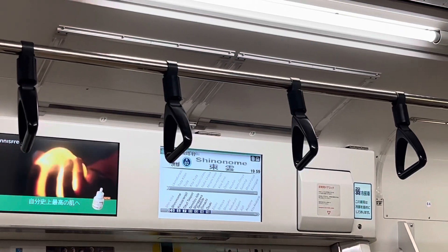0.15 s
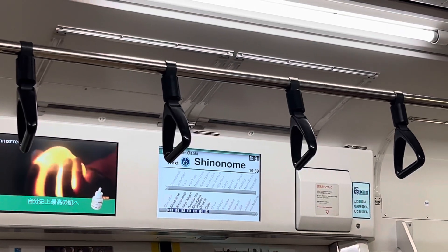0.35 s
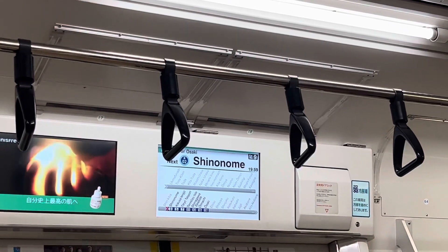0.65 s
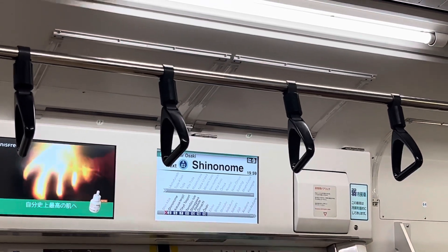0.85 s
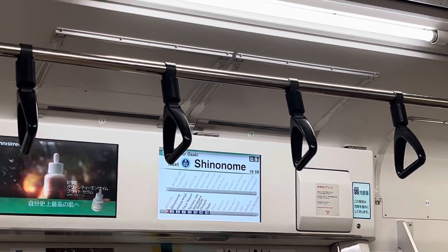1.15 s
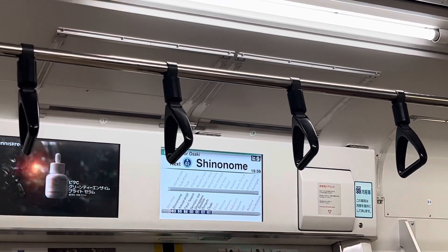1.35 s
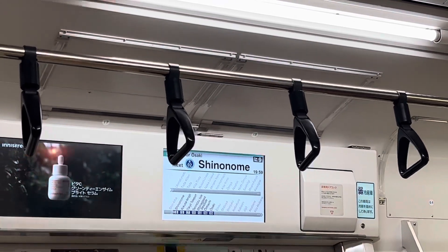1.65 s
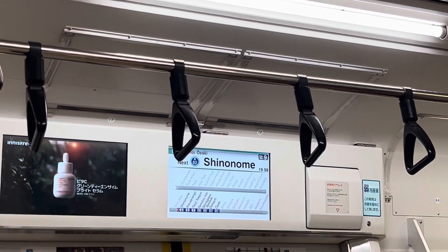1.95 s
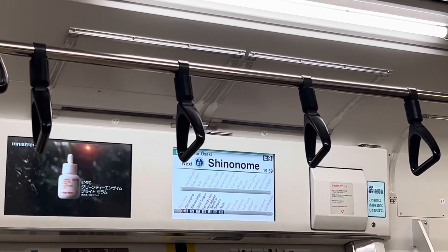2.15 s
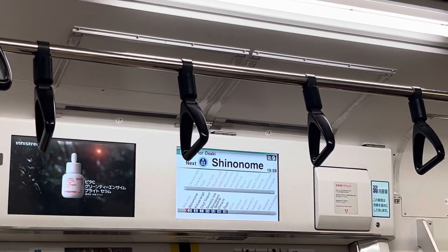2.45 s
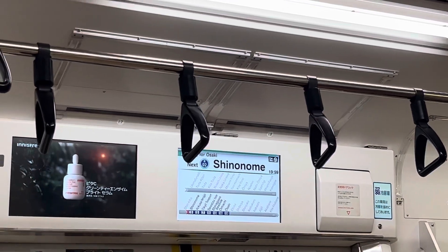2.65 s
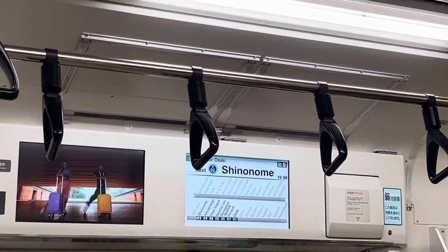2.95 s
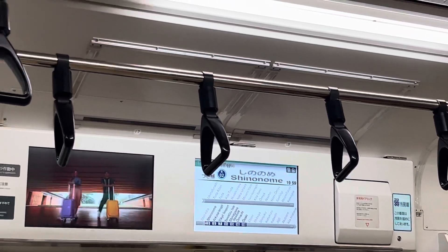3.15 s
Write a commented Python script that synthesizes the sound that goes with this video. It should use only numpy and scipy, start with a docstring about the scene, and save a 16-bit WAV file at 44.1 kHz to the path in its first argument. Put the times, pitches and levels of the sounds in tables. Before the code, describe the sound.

A commuter train rumbles along the rails at steady speed, heard inside with humming motors.

```python
"""Inside a commuter train

The train runs at a nearly steady speed. Low-pitched noise and short deep tones make the car body boom and jolt.
Noise swells make the wheels roar on the rails; narrow noise bands let them ring, and short tones squeal.
The motors hum in sine tones at multiples of a slightly rising shaft speed; the strongest one fades late on.
A soft gear drone comes up midway, and the hiss of ventilation and rolling lies behind it all."""
import sys
import numpy as np
from scipy import signal
from scipy.fft import rfft, irfft, next_fast_len
from scipy.io import wavfile
from scipy.ndimage import uniform_filter1d, map_coordinates

SR = 44100
rng = np.random.default_rng(int(sys.argv[2]) if len(sys.argv) > 2 else 0)


def waveform_to_disk(signal):
    """Save audio, clipped to [-1, 1], as 16-bit WAV at the path in sys.argv[1]."""
    frames = np.transpose(np.atleast_2d(signal))
    scaled = np.clip(frames, -1, 1) * 32767
    samples = np.round(scaled).astype(np.int16)
    wavfile.write(sys.argv[1], SR, samples)


N = 145530  # samples, 3.3 s


def amp(db):
    """Turn decibels into a gain."""
    return 10 ** (np.asarray(db) / 20)


def unit(x):
    """Scale x to an rms (average strength) of 1."""
    return x / np.sqrt(np.mean(x ** 2) + 1e-20)


def along(points, hz):
    """Read a table of (pitch_hz, value) at any pitch, on a log pitch axis."""
    table_hz, values = np.transpose(points)
    return np.interp(np.log(hz + 1), np.log(table_hz + 1), values)


def curve(rows):
    """Join the points of a (time_s, value) table into one value per sample."""
    return np.interp(np.arange(N) / SR, *np.transpose(rows))


def swell(centre_s, half_s):
    """A smooth bell-shaped rise and fall around one moment."""
    return np.exp(-((np.arange(N) / SR - centre_s) / half_s) ** 2)


def wobble(rate_hz):
    """A smooth random curve through rate_hz random points a second."""
    return map_coordinates(rng.standard_normal(400), [np.arange(N) * rate_hz / SR], mode="mirror")


def filtered(x, response):
    """Multiply the spectrum of x by a response that depends on frequency."""
    size = next_fast_len(N + 8192)
    spectrum = rfft(x, size) * response(np.fft.rfftfreq(size, 1 / SR))
    return irfft(spectrum, size)[..., :N]


def shaped(spectrum):
    """The smooth response drawn by a (pitch_hz, level_db) table."""
    return lambda hz: amp(along(spectrum, hz))


def ringing(modes):
    """The response of (pitch_hz, width_hz, level_db) resonances, each applied twice for steep sides."""
    def response(hz):
        total = 0
        for centre, width, db in modes:
            damping = (hz * width) ** 2
            total = total + amp(db) * damping / ((centre * centre - hz * hz) ** 2 + damping)
        return total
    return response


# how alike left and right are at each pitch, limited to -1 (opposite) .. 1 (same): pitch_hz, likeness
EAR_LIKENESS = [(35, 0.95), (80, 1), (250, 0.9), (500, 0.81), (620, 0.55), (790, 0.35), (900, 0.2),
                (1150, -0.21), (1550, -0.3), (1800, 0.61), (2300, .87), (3500, 1), (5000, 1), (6200, 0.47),
                (8000, -1.04), (12000, 0.73)]


def rush(response, patchy_db):
    """Stereo noise of rms 1, with random louder and softer patches in time and pitch."""
    cells = signal.stft(rng.standard_normal((2, N)), nperseg=1024)[2]
    patches = rng.standard_normal(cells.shape[1:])
    patches = uniform_filter1d(patches, size=6, axis=0)  # blur over pitch
    patches = uniform_filter1d(patches, size=10, axis=1)  # blur over time
    pair = signal.istft(cells * amp(patchy_db * unit(patches)), nperseg=1024)[1][:, :N]

    def mid_side(hz):
        angle = np.arccos(np.clip(along(EAR_LIKENESS, hz), -1, 1)) / 2
        return response(hz) * np.array([np.cos(angle), np.sin(angle)])

    mid, side = filtered(pair, mid_side)
    return unit(np.array([mid + side, mid - side]))


def evened(x, size):
    """Take out the swells of x, as averaged twice over size samples."""
    power = uniform_filter1d(uniform_filter1d(np.mean(x ** 2, axis=0), size), size)
    return x / np.sqrt(np.abs(power) + 1e-9)


def tone(hz, db, flutter_db, drift, spread):
    """A sine of wavering level and phase (drift and spread in radians), a little different at each ear."""
    phase = 2 * np.pi * (np.cumsum(hz) / SR + rng.random()) + drift * wobble(9)
    apart = spread * wobble(2.7) * np.array([[1], [-1]])
    return np.sqrt(2) * amp(db + flutter_db * wobble(11)) * np.sin(phase + apart)


# stretches of rough rail: centre_s, half_length_s, rise_db
ROUGH_TRACK = [(0.31, 0.046, 5), (0.42, 0.063, 8.2), (.56, 0.071, 10), (0.675, 0.048, 8), (0.76, 0.041, 7),
               (1.075, 0.081, 3.5), (1.238, 0.048, 2.5), (1.492, 0.043, 3), (1.577, 0.029, 4),
               (1.89, 0.037, 1), (2.02, .03, 5.5), (2.109, 0.029, 5.5), (2.594, 0.057, 4), (2.81, 0.03, 4),
               (3.01, 0.09, 5)]


def roughness_db():
    """Rise in rolling noise as the wheels cross rough stretches of rail."""
    return sum(db * swell(centre, half) for centre, half, db in ROUGH_TRACK)


# colour of the low rumble: pitch_hz, relative_level_db
RUMBLE_SPECTRUM = [(15, -45), (28, -28), (40, -9.5), (54, -1.5), (68, -1.5), (88, -5), (115, -8.5),
                   (150, -37), (300, -95)]
# loudness of the rumble: time_s, level_db
RUMBLE_LEVEL = [(0, -24), (.25, -27), (.4, -23.5), (.58, -24.5), (.76, -18.5), (.92, -23.5), (1.1, -22),
                (1.23, -25.5), (1.55, -20), (1.97, -25.5), (2.2, -21.5), (2.28, -23.5), (2.38, -20),
                (2.6, -24.5), (2.75, -22), (3.1, -23.5), (3.3, -27)]
# jolts that make the car body boom: centre_s, half_length_s, pitch_hz, level_db
JOLTS = [(0.17, 0.044, 59.7, -21.5), (.32, 0.023, 60.45, -15), (0.639, 0.052, 60, -19),
         (1.018, 0.027, 55, -14.5), (1.149, 0.028, 62, -14), (1.285, .025, 65.4, -17),
         (1.35, 0.024, 48, -21.5), (1.532, .035, 58, -21), (1.61, .025, 59.6, -19), (1.69, .028, 53, -16),
         (1.837, 0.018, 54.85, -17), (2.093, 0.031, 57, -16.5), (2.527, 0.082, 60.85, -17.5),
         (2.669, 0.036, 51.8, -19), (2.895, 0.065, 61, -21), (3.05, 0.14, 61, -19.5)]
# colour of the droning floor and wall panels: pitch_hz, relative_level_db
PANEL_SPECTRUM = [(60, -49), (125, -1.5), (165, 3), (212, -1), (255, -1.5), (280, 0.5), (305, 2),
                  (340, -0.5), (395, -0.5), (420, -5.5), (462, -1.5), (495, -6.5), (555, -11.5), (620, -27),
                  (1200, -80)]
# resonance of one ringing panel: pitch_hz, width_hz, relative_level_db
PANEL_MODE = [(391, 22, 0)]
# loudness of that ringing: time_s, level_db
PANEL_RING_LEVEL = [(0, -58), (.4, -45), (.62, -33), (.78, -41.5), (.93, -36), (1.2, -45), (3.3, -59.5)]
PANELS_DB = -27.5  # panel drone on smooth rail


def car_body():
    """The body rumbles and booms with each jolt; floor and wall panels drone, and one of them rings."""
    rumble = evened(rush(shaped(RUMBLE_SPECTRUM), patchy_db=1.5), size=1500) * amp(curve(RUMBLE_LEVEL))
    jolts = 0
    for centre, half, hz, db in JOLTS:
        boom = tone(np.full(N, hz), db, flutter_db=0.5, drift=0.03, spread=0.01)
        jolts = jolts + swell(centre, half) * boom
    drone = evened(rush(shaped(PANEL_SPECTRUM), patchy_db=1.3), size=4000)
    panels = drone * amp(PANELS_DB + 0.12 * roughness_db())  # rough rail lifts them only a little
    ring = evened(rush(ringing(PANEL_MODE), patchy_db=4), size=4000) * amp(curve(PANEL_RING_LEVEL))
    return rumble + jolts + panels + ring


# colour of the rolling roar: pitch_hz, relative_level_db
ROAR_SPECTRUM = [(200, -39), (450, 3), (620, 1.5), (760, 2.5), (880, 0), (1150, 1), (1300, -5), (1450, -9),
                 (2000, -11.5), (2600, -22), (3500, -26), (6000, -38.5), (12000, -81)]
# pitches at which the wheels ring: pitch_hz, width_hz, relative_level_db
WHEEL_MODES = [(1160.4, 65, 1), (1830, 130, -8.5), (2260, 120, -11), (2843, 80, -17), (4670, 83, -24)]
# loudness of that ringing: time_s, level_db
WHEEL_RING_LEVEL = [(0, -36), (.6, -44.5), (.9, -40.5), (1.6, -40.5), (2.3, -41), (2.7, -40), (3.0, -39),
                    (3.3, -44.5)]
ROAR_DB = -35  # roar on smooth rail


def wheels():
    """Rolling roar swells on rough rail, and the wheels ring in a few narrow modes."""
    roar_db = ROAR_DB + roughness_db() + 1.08 * wobble(35.11)
    roar = rush(shaped(ROAR_SPECTRUM), patchy_db=0.5) * amp(roar_db)
    ring = evened(rush(ringing(WHEEL_MODES), patchy_db=3), size=3000) * amp(curve(WHEEL_RING_LEVEL))
    return roar + ring


# brief squeals of a wheel rim (flange) on the rail: centre_s, half_length_s, pitch_hz, level_db
SQUEALS = [(0.22, 0.02, 2290, -40.5), (0.27, 0.024, 2240, -41), (0.432, .025, 2190, -43.5),
           (0.466, 0.086, 1142, -37), (.49, 0.029, 1844, -41), (.535, .025, 2210, -41),
           (.67, .02, 2205, -37.5), (.775, 0.016, 2210, -41), (1.726, .1, 1155, -45),
           (1.843, .05, 1850, -44.5), (2.037, 0.03, 2170, -40), (2.285, .1, 1155, -38.5),
           (2.29, .04, 4570, -52), (2.615, 0.06, 1820, -42.5), (2.8, 0.027, 2230, -39.5),
           (2.948, 0.032, 2240, -40), (2.954, 0.083, 1149, -39), (3.01, 0.036, 1820, -40.5),
           (3.05, 0.11, 1170, -36)]
SQUEAL_WANDER, SQUEAL_FLUTTER_DB = 0.0038, 2.7  # unsteadiness of pitch (as a fraction) and of level
GRIT_DB, GRIT_WIDTH = -6, 0.1  # full friction noise, and its random points per cycle of the squeal
GRIT_FULL_HZ = 2200  # squeals below this pitch are cleaner


def flanges():
    """Each rub of a flange makes one wheel mode sing unsteadily, with a gritty edge."""
    t = np.arange(N) / SR
    swaying_time = np.cumsum(1 + SQUEAL_WANDER * wobble(70)) / SR
    flutter = amp(SQUEAL_FLUTTER_DB * wobble(60))
    knots = rng.standard_normal((2, 4000))
    knot_index = np.arange(4000)
    out = np.zeros(N)
    for centre, half, hz, db in SQUEALS:
        phase = 2 * np.pi * (hz * swaying_time + rng.random())
        grit = amp(GRIT_DB) * min(hz / GRIT_FULL_HZ, 1)
        position = t * hz * GRIT_WIDTH
        # random changes of the sine and of its cosine blur the tone into a narrow noise
        rough_sine = grit * np.interp(position, knot_index, knots[0])
        rough_cosine = grit * np.interp(position, knot_index, knots[1])
        voice = (1 + rough_sine) * np.sin(phase) + rough_cosine * np.cos(phase)
        out += amp(db) * swell(centre, half) * voice
    return out * flutter


# motor shaft speed: time_s, turns_per_second_hz
SHAFT = [(0, 60.6), (.45, 60.7), (.6, 61.5), (.8, 60.9), (1.2, 61.0), (1.45, 61.3), (2.0, 61.4),
         (2.3, 61.65), (3.3, 61.75)]
# steady motor notes: multiple_of_shaft_speed, start_level_db, end_level_db
ORDERS = [(2, -34.5, -40), (4, -36, -35.5), (5, -46.5, -36.5), (6, -33, -56.5), (11, -48.5, -64)]
# loudness of the main hum, eight times the shaft speed: time_s, level_db
HUM_LEVEL = [(0, -35.5), (.3, -28.5), (.62, -36.5), (.92, -30), (1.5, -32), (2.1, -30), (2.33, -39.5),
             (2.5, -34.5), (3.15, -34.5), (3.3, -37.5)]
# loudness of a second, slightly slower motor: time_s, level_db
SECOND_MOTOR_LEVEL = [(0, -37), (.4, -30.5), (.65, -42), (1.4, -38), (2.05, -41.5), (2.4, -50), (3.3, -57)]
# loudness of the whine an octave above the hum: time_s, level_db
WHINE_LEVEL = [(0, -63), (.9, -50), (1.5, -47), (2.05, -45), (2.3, -46), (2.55, -56)]
SECOND_LAG_HZ = 11  # how far the second motor's note lies below the hum


def motors():
    """Multiples of the shaft speed sound as tones; a slower second motor beats with the main note."""
    shaft_hz = curve(SHAFT)
    hum_hz = 8 * shaft_hz
    orders = 0
    for multiple, start_db, end_db in ORDERS:
        level_db = np.linspace(start_db, end_db, N)
        orders = orders + tone(multiple * shaft_hz, level_db, flutter_db=2, drift=0.16, spread=0.1)
    hum = tone(hum_hz, curve(HUM_LEVEL), flutter_db=0.7, drift=0.03, spread=0.15)
    second_hz = hum_hz - SECOND_LAG_HZ
    second = tone(second_hz, curve(SECOND_MOTOR_LEVEL), flutter_db=2, drift=0.3, spread=0.2)
    whine = tone(2 * hum_hz, curve(WHINE_LEVEL), flutter_db=0.8, drift=0.04, spread=0.3)
    return orders + hum + second + whine


# resonance of the gear drone: pitch_hz, width_hz, relative_level_db
GEAR_MODE = [(788, 53, 0)]
# loudness of the gear drone: time_s, level_db
GEAR_LEVEL = [(0, -45), (.9, -48), (1.1, -40), (1.6, -42.5), (1.9, -42), (2.3, -48.5), (3.3, -54)]


def gear():
    """Noise through one resonance: a blurred drone of the gearing that comes up midway."""
    return evened(rush(ringing(GEAR_MODE), patchy_db=-1.5), size=3000) * amp(curve(GEAR_LEVEL))


# colour of the hiss: pitch_hz, relative_level_db
HISS_SPECTRUM = [(500, -6.5), (1300, 9), (1560, 10.5), (1850, 9), (2250, 7.5), (2600, 2), (2950, 3),
                 (3400, -1.5), (4700, -3.5), (5500, -7.5), (6400, -11), (7400, -9.5), (8400, -20),
                 (14000, -53)]
# colour of the faint high fizz: pitch_hz, relative_level_db
FIZZ_SPECTRUM = [(3000, -21.5), (6000, 7), (8300, -21.5), (9600, 5), (11000, 0.5), (13000, -2.5),
                 (14200, -5)]
# moments when the fizz rises: centre_s, half_length_s, rise_db
FIZZ_SWELLS = [(.43, 0.074, 0), (.56, .03, 3.5), (0.673, .06, 4), (1.196, .025, 3.5)]
HISS_DB, FIZZ_DB = -41, -60  # levels before any rise
HISS_ROUGH_SHARE = 0.18  # how much the hiss follows the rough track


def air():
    """Hiss of ventilation and rolling, a little stronger on rough rail, under a faint high fizz."""
    hiss_db = HISS_DB + HISS_ROUGH_SHARE * roughness_db() + 0.16 * wobble(13)
    hiss = rush(shaped(HISS_SPECTRUM), patchy_db=1.55) * amp(hiss_db)
    rise_db = sum(db * swell(centre, half) for centre, half, db in FIZZ_SWELLS)
    fizz = rush(shaped(FIZZ_SPECTRUM), patchy_db=2.5) * amp(FIZZ_DB + rise_db)
    return hiss + fizz


# balance between the ears: pitch_hz, left_minus_right_db
LEAN = [(60, 0.6), (130, -0.3), (350, 0.3), (900, 0), (1300, -3), (1700, -6.5), (2200, -3.5), (3200, 0)]


def scene():
    """Everything in the car; the upper mids come more from the right."""
    car = car_body() + wheels() + flanges() + motors() + gear() + air()
    halves = np.array([[0.5], [-0.5]])  # each ear takes half of the difference
    return filtered(car, lambda hz: amp(along(LEAN, hz) * halves))


TOP_HZ = 14300


def record(dry):
    """The recorder keeps nothing above its band limit."""
    return filtered(dry, lambda hz: hz < TOP_HZ)


dry = scene()
out = record(dry)
waveform_to_disk(out)
```